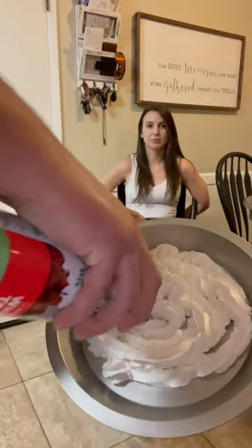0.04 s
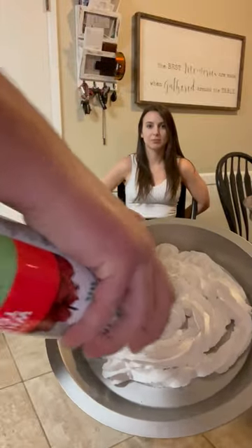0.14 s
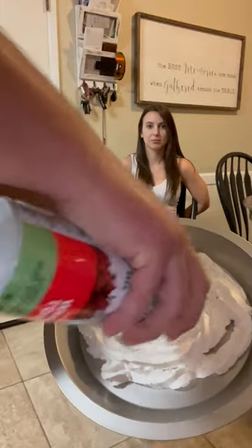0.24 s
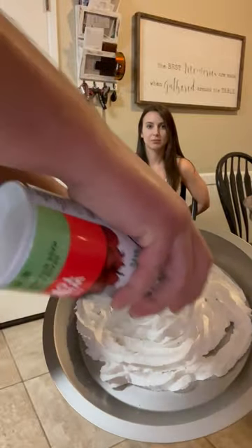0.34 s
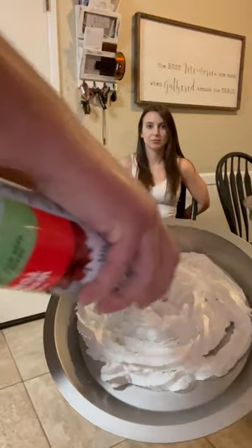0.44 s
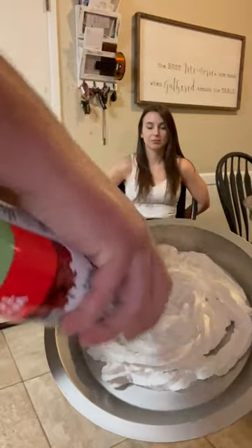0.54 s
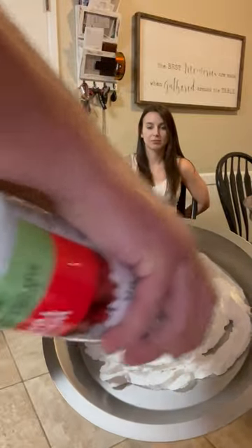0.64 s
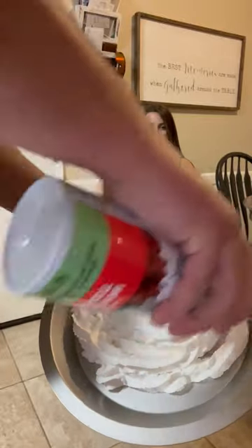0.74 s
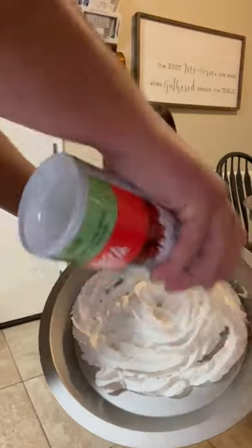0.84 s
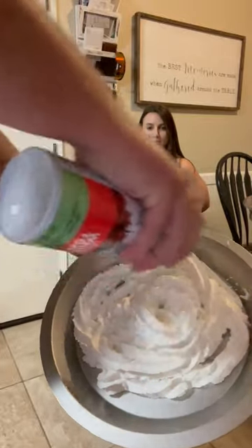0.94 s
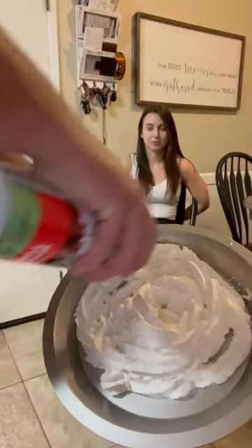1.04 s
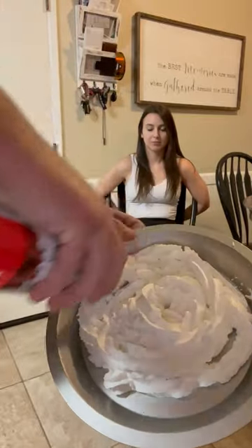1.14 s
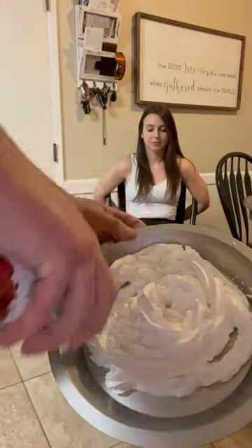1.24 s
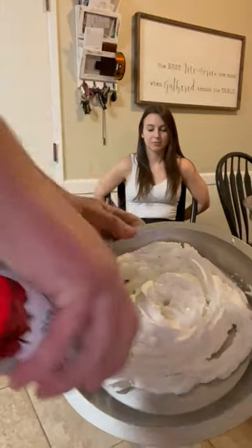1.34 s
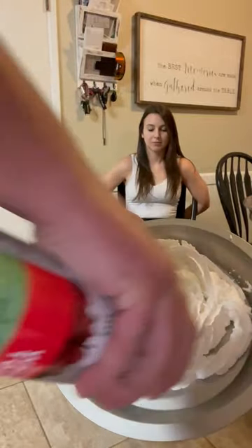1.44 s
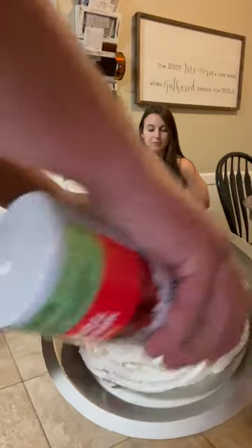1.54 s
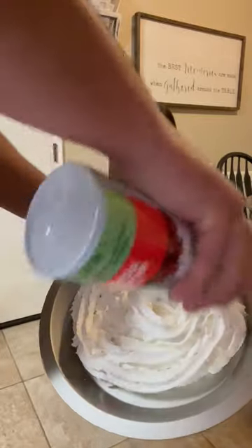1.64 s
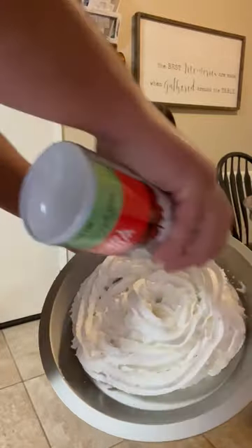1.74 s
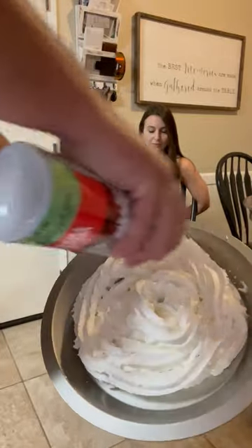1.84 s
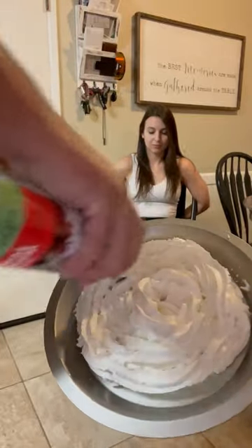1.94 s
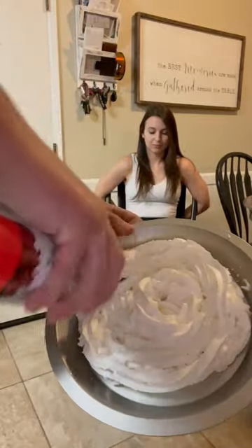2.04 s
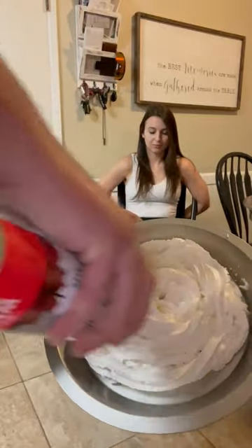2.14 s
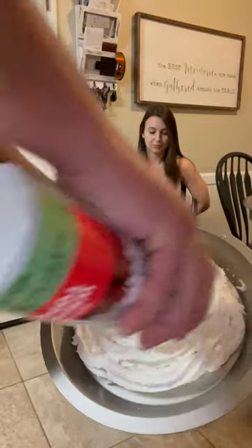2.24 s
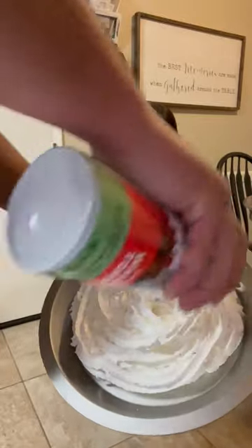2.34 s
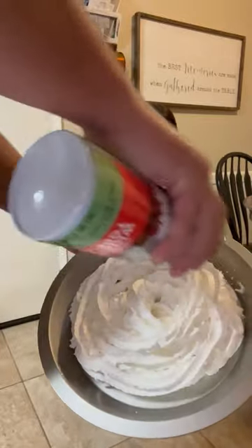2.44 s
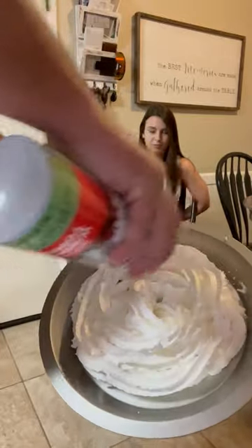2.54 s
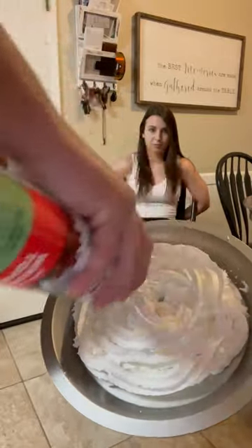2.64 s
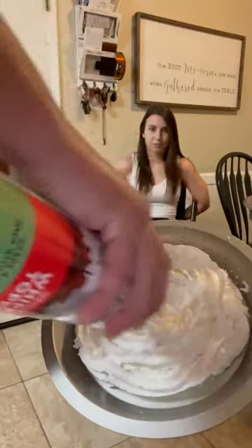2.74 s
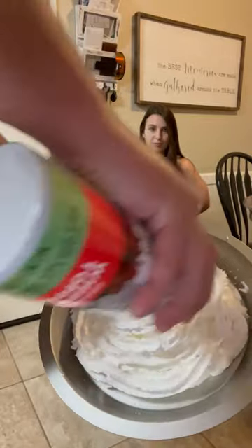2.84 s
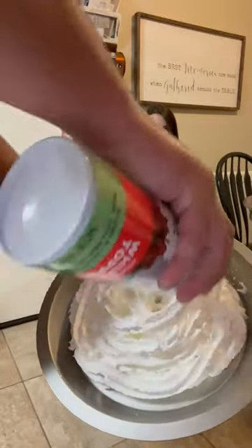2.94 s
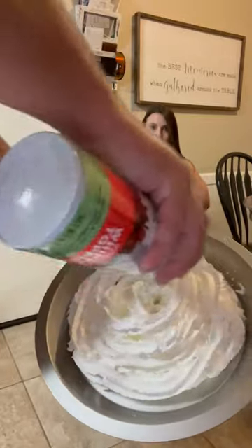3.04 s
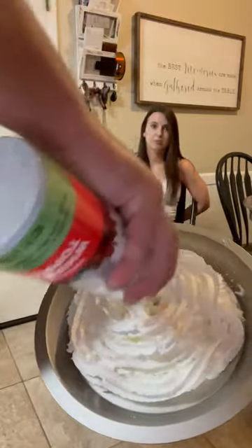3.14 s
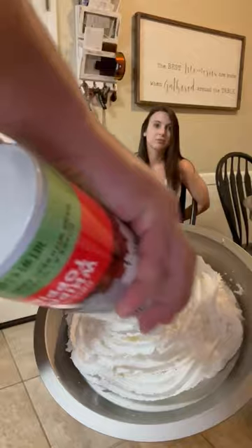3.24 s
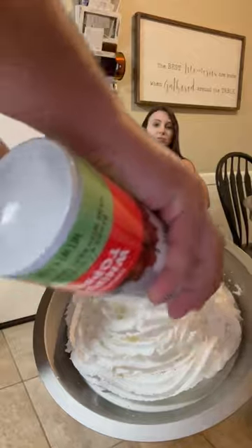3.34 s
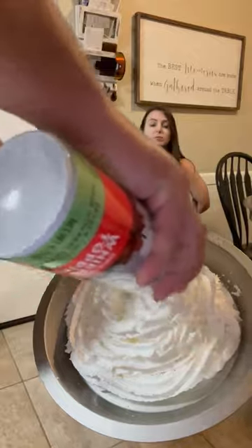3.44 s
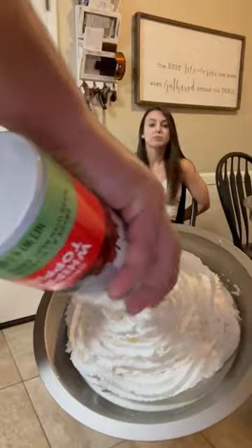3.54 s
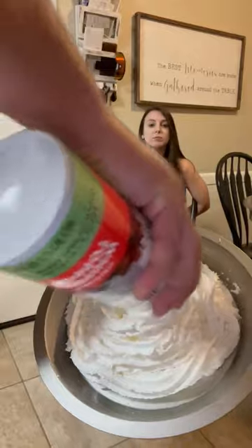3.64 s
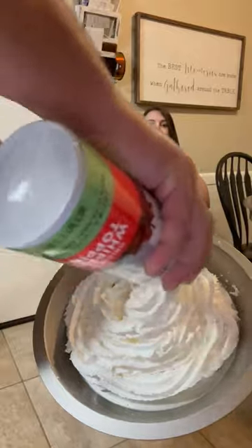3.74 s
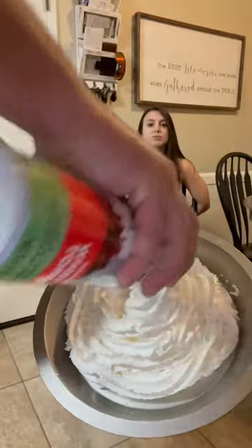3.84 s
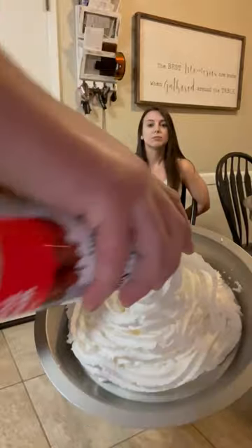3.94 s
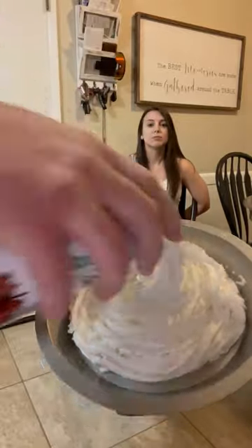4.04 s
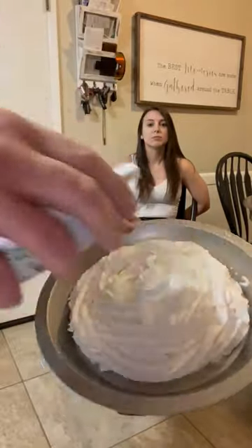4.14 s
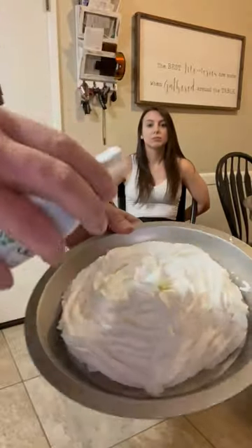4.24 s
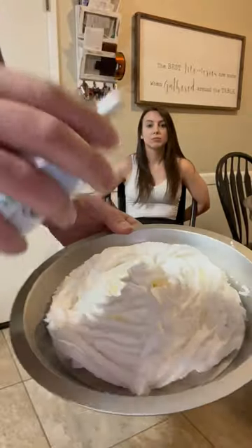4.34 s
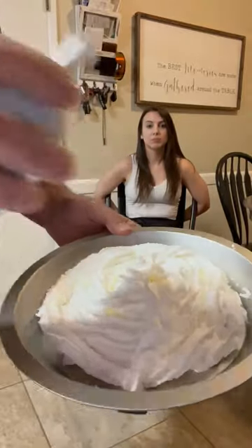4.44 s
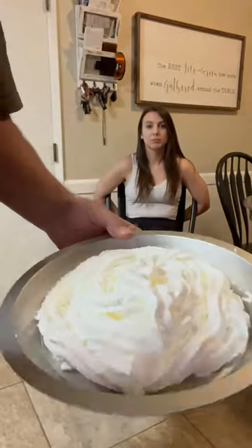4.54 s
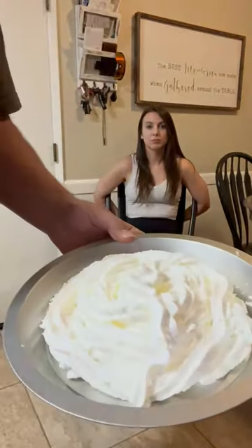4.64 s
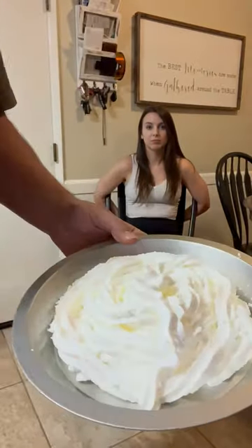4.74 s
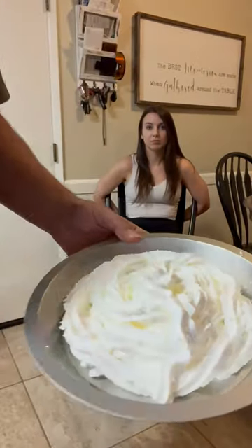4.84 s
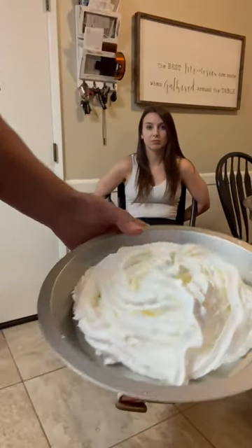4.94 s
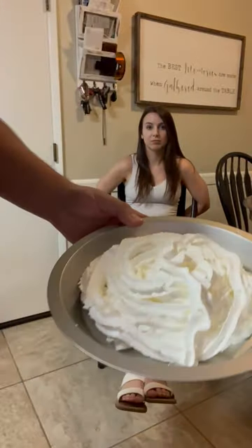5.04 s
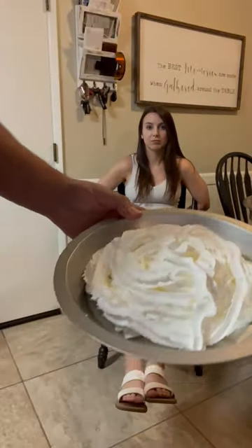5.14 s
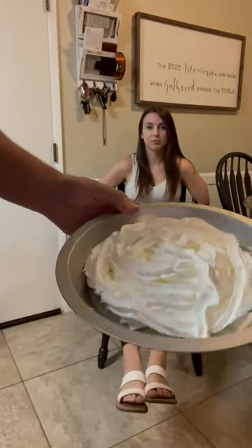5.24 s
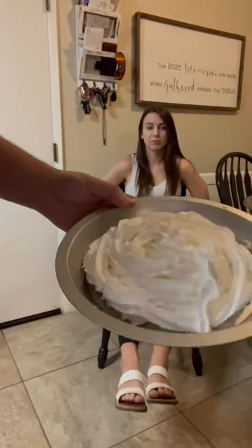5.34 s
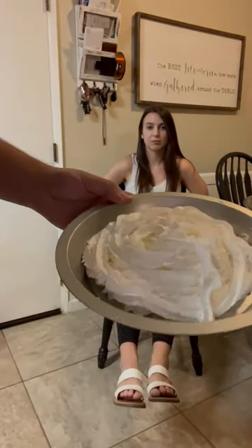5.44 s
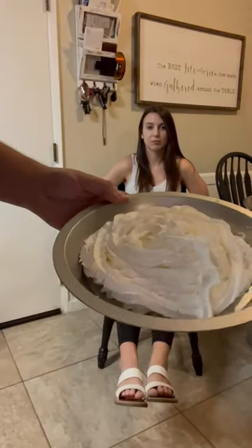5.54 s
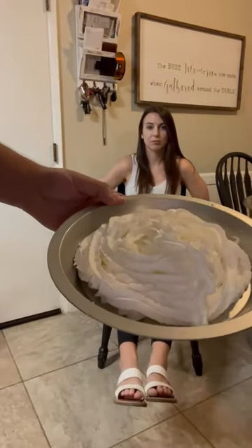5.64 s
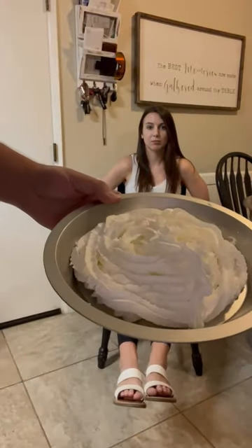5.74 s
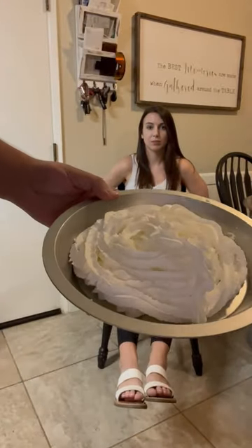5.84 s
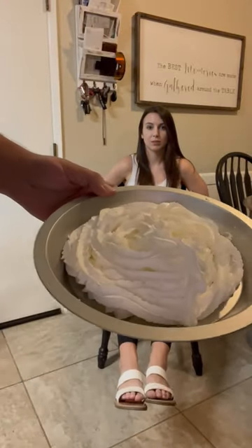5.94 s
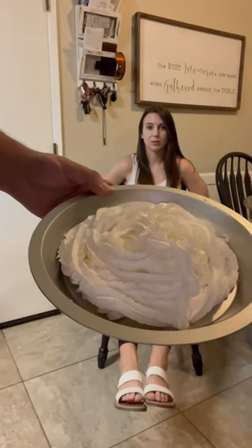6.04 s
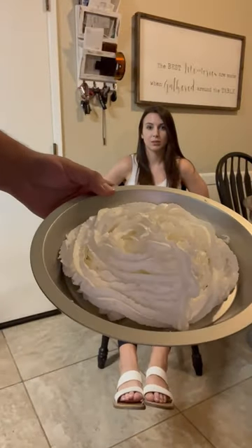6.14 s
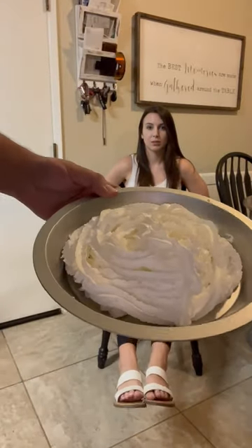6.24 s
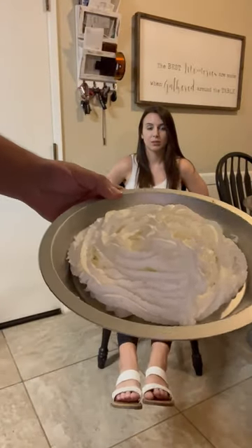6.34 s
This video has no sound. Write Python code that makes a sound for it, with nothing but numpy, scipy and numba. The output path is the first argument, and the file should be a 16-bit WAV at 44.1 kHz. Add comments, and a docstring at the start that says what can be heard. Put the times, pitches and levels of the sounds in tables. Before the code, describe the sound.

Heard very close in stereo, an aerosol can sprays whipped cream into a metal tin with a sputtering, bubbly, whistling hiss that surges as the hand circles. It shuts off suddenly. Faint appliance hum and room air remain, with tiny handling ticks, then the can is set down with a sharp hard knock and small rattling contacts. Soft steps and scuffs follow in the tiled kitchen.

```python
"""An aerosol can sprays whipped cream into a metal pie tin in a tiled kitchen, heard by two close ports.
Gas and foam share the nozzle: bursting cells are filtered noise pulses, jet and whistle are turbulence and
resonance, until the valve snaps shut. The can is then put down with a hard knock and rocks: short contacts
excite its decaying modes and those of the top beneath. Handling ticks and a soft step follow, over
an appliance's hum (steady sines), room air and faint hiss (coloured noise)."""
import sys
import numpy as np
from scipy import signal
from scipy.fft import rfft, irfft, next_fast_len
from scipy.io import wavfile
from scipy.ndimage import uniform_filter1d
from numba import njit

SR = 44100
rng = np.random.default_rng(int(sys.argv[2]) if len(sys.argv) > 2 else 0)


def store_wav(level_fs):
    """Save 16-bit WAV to argv[1]."""
    pcm = np.round(np.clip(np.atleast_2d(level_fs), -1, 1) * 32767)
    wavfile.write(sys.argv[1], SR, pcm.T.astype(np.int16))


N = 282240
T = np.arange(N) / SR


def undb(db):
    """Logarithmic level: decibels to amplitude gain."""
    return 10 ** (np.asarray(db) / 20)


def unit(x):
    """Normalisation: scale to rms 1."""
    return x / np.sqrt(np.mean(x ** 2))


def noise():
    """White noise: equal power at every frequency."""
    return rng.standard_normal(N)


def curves(table):
    """Linear interpolation: each column of a timed table, sample by sample."""
    s, *columns = np.transpose(table)
    return [np.interp(T, s, column) for column in columns]


def on_bins(points, size):
    """Logarithmic frequency scale: join (f/Hz, value) points for each bin of a transform."""
    hz, value = np.transpose(points)
    bins_hz = np.fft.rfftfreq(size, 1 / SR)
    return np.interp(np.log1p(bins_hz), np.log1p(np.abs(hz)), value)


def colour(x, points, size=4096):
    """Minimum-phase filtering: a folded cepstrum gives a causal filter with the (f/Hz, level/dB) outline."""
    cepstrum = irfft(np.log(undb(on_bins(points, size))))
    cepstrum[1:size // 2] *= 2
    cepstrum[size // 2 + 1:] = 0
    response = irfft(np.exp(rfft(cepstrum)))
    return signal.fftconvolve(x, response)[:len(x)]


@njit
def resonate(x, hz, width):
    """Second-order resonance: a band-pass with a moving centre and gain 1 at its peak."""
    y, band, low = np.empty(len(x)), 0., 0.
    for i in range(len(x)):
        g = np.tan(np.pi * min(hz[i] / SR, .45))
        k = width / hz[i]  # damping, the inverse of Q
        v = (band + g * (x[i] - low)) / (1 + g * (g + k))
        band, low = 2 * v - band, low + 2 * g * v
        y[i] = k * v
    return y


def walk(rate):
    """Low-passed random fluctuation: smooth wandering with rms 1, rate in new values per second."""
    k = max(int(SR / rate), 1)
    steps = np.repeat(noise()[:N // k + 1], k)[:N]
    return unit(uniform_filter1d(steps, k))


def fade(start, decay):
    """Exponential relaxation: sudden onset, then a fall with time constant decay."""
    return (T >= start) * np.exp(-np.clip((T - start) / decay, 0, 50))


def blows(rows):
    """Impulsive excitation: one impulse for each (t/s, level/dB) row."""
    x = np.zeros(N)
    for s, db in rows:
        x[int(s * SR)] += undb(db)
    return x


def ring(x, modes):
    """Modal superposition: excite decaying sines (f/Hz, level/dB, T60/s)."""
    t = T[:SR // 2]
    response = 0
    for hz, db, t60 in modes:
        response = response + undb(db) * np.sin(2 * np.pi * hz * t) * np.exp(-np.log(1000) * t / t60)
    return signal.fftconvolve(x, response)[:len(x)]


# How much louder the left port is than the right: f/Hz, level/dB
PORT_BALANCE = [(60, -0.5), (200, 0), (400, 1.5), (700, 2.5), (1290, 5), (2100, 1), (3000, 2.5), (4400, 0),
                (8000, -0.5), (9500, 0), (15000, 0)]


def ports(x, lead):
    """Interchannel difference: two ports hear one source with a phase (f/Hz, left lead/rad) and level gap."""
    size = next_fast_len(N + SR // 4)
    phase = np.interp(np.fft.rfftfreq(size, 1 / SR), *np.transpose(lead))
    half = undb(on_bins(PORT_BALANCE, size) / 2) * np.exp(.5j * phase)  # half the gap on each side
    return irfft(rfft(x, size) * np.array([half, 1 / half]), size)[:, :N]


def diffuse(size, apart_hz=750):
    """Diffuse-field coherence: stereo noise alike in the bass, unrelated in the treble."""
    mid, side = rfft(rng.standard_normal((2, size)))
    hz = np.fft.rfftfreq(size, 1 / SR)
    share = .5 * hz ** 1.5 / (hz ** 1.5 + apart_hz ** 1.5)
    return irfft(np.sqrt(1 - share) * mid + np.sqrt(share) * side * np.array([[1], [-1]]), size)


# Reverberation time of the room: f/Hz, T60/s
ROOM_DECAY = [(100, .58), (500, 0.47), (1300, 0.45), (3000, 0.62), (6000, 0.45), (10000, 0.3), (16000, 0.3)]
# Spectral balance of the reverberation: f/Hz, level/dB
REVERB_TONE = [(100, -2), (500, 2.5), (1200, 1), (2500, -4), (4200, -1.5), (6500, -2.5), (7700, -5),
               (9000, -6), (10500, 0), (12000, 4.5), (16000, -6)]


def kitchen(x, build_s=0.012):
    """Reverberation: dense echoes from tiles and walls build up, then die, quickest at the top of the treble."""
    size = 256
    _, t, frames = signal.stft(diffuse(SR), SR, nperseg=size)
    decay = np.exp(-np.log(1000) * t / on_bins(ROOM_DECAY, size)[:, None])
    tone = undb(on_bins(REVERB_TONE, size))[:, None]
    build = 1 - np.exp(-t / build_s)
    response = signal.istft(frames * decay * tone * build, SR)[1]
    return signal.fftconvolve(x[None], response / np.sqrt(SR / 20), axes=1)[:, :N]


# Partials of the appliance: f/Hz, level/dB
HUM_PARTIALS = [(59.2, -71.5), (118.4, -66), (177.6, -59.5), (355.3, -62.5), (473.7, -78.5)]


def hum():
    """Additive synthesis: an appliance's partials waver slightly in level."""
    sound = 0
    for hz, db in HUM_PARTIALS:
        sound = sound + undb(db + 1.0 * walk(4.6)) * np.sin(2 * np.pi * (hz * T + rng.random()))
    return sound


# Spectrum of the still air: f/Hz, density/dB
AIR_SPECTRUM = [(30, -14.5), (62, 1), (110, -4.5), (200, -5), (340, -8), (550, -12.5), (800, -17),
                (1300, -25.5), (1650, -20.5), (2300, -37), (6000, -39.5), (9000, -55), (13000, -50.5),
                (16000, -53.5)]


def air():
    """Diffuse sound field: coloured noise from all directions is the room at rest."""
    sound = unit(np.array([colour(x, AIR_SPECTRUM) for x in diffuse(N)]))
    return sound * undb(-56 + 0.23 * walk(8.4))


# Spectrum of the faint hiss: f/Hz, density/dB
HISS_SPECTRUM = [(900, 0.5), (2100, 0), (2750, 6), (3400, -7.5), (4150, 0.5), (5000, -8.5), (9000, -23),
                 (13000, -22.5), (16000, -25)]
# Its coming and going: t/s, level/dB
HISS_LEVELS = [(4.0, -66), (4.3, -65), (4.5, -74), (4.9, -86), (5.05, -55), (5.6, -70.5), (5.85, -80),
               (5.95, -61.5), (6.4, -61.5)]
# Spectrum of a faint high fizz: f/Hz, density/dB
FIZZ_SPECTRUM = [(5000, -20.5), (10000, -7.5), (12500, -1), (16000, -6.5)]
# Its course, to which a random flutter is added: t/s, level/dB
FIZZ_LEVELS = [(4.0, -84), (4.33, -86), (4.62, -73), (4.85, -83), (5.0, -82), (5.3, -74), (5.5, -80),
               (5.75, -78), (6.1, -78), (6.3, -78), (6.39, -70)]


def hiss():
    """Precedence effect: hiss and fizz arrive first and louder at the left, so they seem to lie there."""
    sound = unit(colour(noise(), HISS_SPECTRUM)) * undb(curves(HISS_LEVELS)[0])
    fizz = unit(colour(noise(), FIZZ_SPECTRUM))
    sound = sound + fizz * undb(curves(FIZZ_LEVELS)[0] + 1.2 * walk(14))
    late = np.interp(T - .00027, T, sound)
    return np.array([sound, undb(-1.5) * late])


def background():
    """Superposition: hum, still air and faint hiss add."""
    return hum() + air() + hiss()


# Contacts of soft steps on the floor: t/s, relative level/dB
STEP_CONTACTS = [(5.700, -43.5), (5.754, -33), (5.772, -36.5), (5.797, -38), (5.818, -41.5), (6.032, -39.5),
                 (6.046, -42)]
# Modes of the floor: f/Hz, level/dB, T60/s
FLOOR_MODES = [(67.7, -6, .09), (108, 4.5, 0.06), (149, -0.5, 0.075), (255, -1, 0.06), (345, -3, 0.06),
               (780, -13, .035)]


def steps():
    """Impact excitation: each soft contact sets the floor's damped modes ringing."""
    return undb(-2.5) * ring(blows(STEP_CONTACTS), FLOOR_MODES)


# Ticks and scuffs: t/s, relative level/dB, centre f/Hz, width/Hz, rise and decay time constants/s
TICK_EVENTS = [(4.077, -66, 13100, 9050, .002, 0.0044), (4.202, -69, 13000, 8970, 0.0019, .004),
               (4.354, -51, 8990, 11000, 0.0042, 0.017), (4.744, -58, 2490, 2500, 0.0024, 0.0055),
               (5.660, -49, 2700, 1790, 0.001, .005), (5.670, -54, 3200, 5000, 0.0011, 0.0045),
               (5.68, -58, 2500, 4000, .03, .05), (5.705, -52.5, 2200, 2400, .003, 0.012),
               (5.743, -45.5, 1500, 2400, 0.001, 0.009), (5.756, -42.5, 700, 1000, 0.004, 0.022),
               (5.834, -57, 12500, 4980, 0.002, 0.004), (5.89, -55.5, 5930, 1110, 0.04, 0.043),
               (6.115, -53, 12940, 4480, 0.0019, 0.003), (6.18, -57.5, 12000, 12100, 0.016, .02)]


def ticks():
    """Friction noise: fingers and clothes make short bands of noise."""
    sound = 0
    for s, db, hz, width, rise, decay in TICK_EVENTS:
        centre = np.full(N, float(hz))
        once = resonate(noise(), centre, float(width))
        scuff = unit(resonate(once, centre, float(width)))
        sound = sound + undb(db) * fade(s, decay) * (1 - fade(s, rise)) * scuff
    return sound


# Phase lead of the left port for the knock and handling: f/Hz, lead/rad
KNOCK_PHASE = [(0, 0.3), (500, 2.75), (850, 1.7), (1200, 2.5), (1600, 1.75), (2000, 2.1), (2500, 0.59),
               (3200, 1.8), (4100, 1.2), (4800, 2.5), (6400, 1.4), (9000, 3.1), (13300, 5.1)]


def handling():
    """Direct and reverberant sound: steps and ticks at the two ports, with the room."""
    sound = steps() + ticks()
    return ports(sound, KNOCK_PHASE) + undb(-6.0) * kitchen(sound)


# Modes of the can: f/Hz, level/dB, T60/s
CAN_MODES = [(360, -16, .03), (720, -25, .04), (930, -20, 0.03), (985, -23, 0.11), (1270, -12.5, 0.06),
             (1430, -19, 0.09), (1530, -6, 0.012), (1720, -17, .03), (1905, -8.5, 0.018), (1980, -23, .05),
             (2480, -10, 0.008), (2750, -13, .012), (4200, -15, 0.014), (6150, -17, 0.01)]
# How well the can radiates: f/Hz, level/dB
CAN_RADIATION = [(60, -16), (200, -8), (500, 1), (900, 6), (1450, 2), (2000, 6), (2600, 1), (3300, -6),
                 (4200, -2.5), (5000, -5.5), (6500, -5), (9000, -28)]
# Spectrum of the rim's crack: f/Hz, density/dB
CRACK_SPECTRUM = [(100, -19.5), (500, -11.5), (1500, 6), (2500, 3), (3200, -8), (4200, -9), (4900, -16),
                  (6100, -1.5), (7000, -10), (8000, -22), (11000, -15), (16000, -23)]
FOCUS_DB, FOCUS_OCTAVES = 8, .22  # how strongly and how narrowly a spot favours its modes
BUZZ_DB, DETUNE = -22, .018  # the rim's buzz against the blow; scatter of the modes' pitch (share)


def contact(db, hard_db, buzz_s, focus_hz):
    """Position-dependent modal excitation: one touch cracks and buzzes; each spot favours and detunes modes."""
    t = T[:SR // 2]
    buzz, grit = rng.standard_normal((2, len(t)))
    push = (t == 0) + undb(BUZZ_DB) * buzz * np.exp(-t / buzz_s)
    hz, mode_db, t60 = np.transpose(CAN_MODES)
    favoured = np.exp(-(np.log2(hz / focus_hz) / FOCUS_OCTAVES) ** 2)
    detuned_hz = hz * np.exp(DETUNE * rng.standard_normal(len(hz)))
    modes = zip(detuned_hz, mode_db + FOCUS_DB * favoured, t60)
    body = colour(ring(push, modes), CAN_RADIATION)
    crack = colour(grit * np.exp(-t / 0.0016), CRACK_SPECTRUM)
    return undb(db) * (undb(-8.5) * body + undb(-5.5) * undb(hard_db) * crack)


# The rim meeting a hard top: t/s, relative level/dB, hardness (relative crack level)/dB,
# time constant of the buzz/s, favoured f/Hz
RIM_CONTACTS = [(5.0166, -25, -26, .005, 1560), (5.0210, -11, -26, 0.0026, 1560),
                (5.0268, -9, -14, .003, 2600), (5.0284, -1, -1, .0032, 1600),
                (5.0334, -12, -22, 0.0034, 1280), (5.048, -22, -16, .005, 1300),
                (5.072, -23, -20, .005, 1400), (5.133, -27, -20, .006, 1440),
                (5.1617, -13, -14, 0.0037, 1250), (5.1902, -17, 0, .005, 900),
                (5.1925, -17, -6, .004, 1300), (5.2112, -23.5, -1, .005, 1000),
                (5.219, -26, -5, .003, 1700)]
# The can's weight coming down on the top: t/s, relative level/dB
WEIGHT_THUMPS = [(5.036, 0), (5.194, -9)]
# Modes of the top: f/Hz, level/dB, T60/s
TOP_MODES = [(135, -2, .26), (242, -4, .16), (345, -3, .05), (510, 0, .07), (673, -2, .16), (748, -3, .2)]
# Single echoes from nearby walls: delay t/s, level/dB
NEARBY_WALLS = [(0.023, -15), (.061, -23.5)]


def can():
    """Multiple impact: the rim lands in quick contacts and rocks back; the top thumps a moment later."""
    sound = undb(-30) * ring(blows(WEIGHT_THUMPS), TOP_MODES)
    for s, *touch_settings in RIM_CONTACTS:
        touch, start = contact(*touch_settings), int(s * SR)
        sound[start:start + len(touch)] += touch
    echoes = sum(undb(db) * np.interp(T - delay, T, sound) for delay, db in NEARBY_WALLS)
    echoes = colour(echoes, [(2000, -0.5), (6000, -5), (10000, -12)])
    nearby = kitchen(sound, build_s=0.013)[0]  # most echoes come from the side where the can stands
    direct = ports(sound + echoes + undb(-8.0) * nearby, KNOCK_PHASE)
    return direct + undb(-7.5) * kitchen(sound, build_s=0.0078)


# Swells as the hand circles, with gas surging on some turns: middle t/s, length t/s, foam swell/dB,
# gas surge/dB (each layer follows in its own proportion), foam pocket f/Hz, gas channel f/Hz
HAND_TURNS = [(0.297, 0.11, 6, 8.5, 1030, 3400), (0.739, .16, 5.5, 9.5, 1030, 4000),
              (0.988, 0.21, 4, -0.5, 1200, 3700), (1.447, 0.13, 1.5, 2, 1370, 3570),
              (1.9, 0.21, 3, -0.5, 1130, 3740), (2.275, .18, 6.5, 10.5, 1040, 3800),
              (2.564, 0.13, 2, -1, 1130, 3750), (2.856, 0.083, 6, 11.5, 1070, 4140),
              (2.953, 0.072, 5, 7.5, 1070, 3130), (3.375, 0.13, 7, 6, 1300, 2900),
              (3.728, 0.089, 5.5, 5, 870, 4120)]
TURN_EDGE = 5.1  # steepness of a swell's flanks: higher is more flat-topped
POCKET_REST_HZ, CHANNEL_REST_HZ = 941, 3600  # resonances between swells


def turns():
    """Slow modulation: rounded humps of foam swell (dB), gas surge (dB), pocket and channel pitch (Hz)."""
    swell, surge, pocket_hz, channel_hz = 0, 0, POCKET_REST_HZ, CHANNEL_REST_HZ
    for s, length, foam_db, gas_db, foam_hz, gas_hz in HAND_TURNS:
        hump = np.exp(-np.abs(2 * (T - s) / length) ** TURN_EDGE * np.log(2))
        swell, surge = swell + foam_db * hump, surge + gas_db * hump
        pocket_hz = pocket_hz + (foam_hz - POCKET_REST_HZ) * hump
        channel_hz = channel_hz + (gas_hz - CHANNEL_REST_HZ) * hump
    return swell, surge, pocket_hz, channel_hz


def bubbles(per_s, spread_db):
    """Poisson-like shot noise: tiny gas cells burst at random moments, with random sizes."""
    bursts = rng.random(N) < per_s / SR
    return unit(bursts * noise() * undb(spread_db * noise()))


# Spectrum of the sputtering foam: f/Hz, density/dB
FOAM_SPECTRUM = [(60, -38), (200, -25.5), (400, -17), (520, -7), (650, -1), (830, -1.5), (1050, -5.5),
                 (1380, 0), (1650, -3.5), (2000, -15.5), (3000, -21.5), (8000, -40.5)]
POCKET_WIDTH_HZ, POCKET_DB = 330., 3  # the pocket's resonance
POCKET_PER_SWELL = 0.38  # its ring grows by this many dB for each dB of swell


def foam(swell, pocket_hz, sputter, unsteady):
    """Cavity resonance: cells burst in a pocket of cream whose pitch wanders."""
    bursts = unit(colour(bubbles(per_s=5000, spread_db=2.0), FOAM_SPECTRUM))
    pocket = resonate(bursts, pocket_hz * np.exp(0.077 * walk(15)), POCKET_WIDTH_HZ)
    sound = unit(bursts + undb(POCKET_DB + POCKET_PER_SWELL * swell) * pocket)
    return sound * undb(-31.5 + 0.74 * swell + 0.44 * sputter + 0.66 * unsteady)


# Spectrum of cream landing on the mound: f/Hz, density/dB
LANDING_SPECTRUM = [(40, -17), (70, -13), (150, -13.5), (260, 1), (420, 0), (560, 1), (800, -7),
                    (1600, -27)]


def flutter(surge, sputter):
    """Random impacts: landing cream makes a low flutter that grows with the gas."""
    sound = unit(colour(bubbles(per_s=2500, spread_db=2.0), LANDING_SPECTRUM))
    return sound * undb(-46 + 0.42 * surge + 0.47 * sputter)


# Spectrum of escaping gas: f/Hz, density/dB
RASP_SPECTRUM = [(800, -23.5), (1900, -2), (2500, 0), (2950, -3), (3600, -0.5), (4300, 0), (5200, -2.5),
                 (7500, -10), (15000, -26)]
# Level of the rasp between surges: t/s, level/dB
RASP_LEVELS = [(0, -32.5), (.42, -41), (.58, -35.5), (.9, -40), (1.25, -34.5), (1.72, -42.5), (2.1, -38),
               (2.65, -36.5), (3.5, -35)]
CHANNEL_WIDTH_HZ, CHANNEL_DB = 445., 4  # resonance of the channel that the gas opens through the cream


def rasp(surge, channel_hz, sputter, unsteady):
    """Duct resonance: gas bursts through a channel in the cream that keeps changing."""
    gas = unit(colour(bubbles(per_s=7000, spread_db=2.5), RASP_SPECTRUM))
    channel = resonate(gas, channel_hz * np.exp(0.07 * walk(11)), CHANNEL_WIDTH_HZ)
    gas = unit(gas + undb(CHANNEL_DB) * channel)
    return gas * undb(curves(RASP_LEVELS)[0] + surge + .77 * sputter + .9 * unsteady)


# Whistle pitch as the finger's pressure changes: t/s, f/Hz
WHISTLE_PITCHES = [(0.0, 6200), (0.88, 6060), (1.39, 6310), (1.52, 6040), (1.66, 6300), (1.79, 6030),
                   (2.06, 6170), (2.27, 5900), (2.37, 6340), (2.84, 6040), (3.31, 6320), (3.8, 6070)]
# Whistle level between surges: t/s, level/dB
WHISTLE_LEVELS = [(0, -37.5), (.25, -34.5), (.45, -38.5), (.75, -37.5), (.87, -33.5), (1.05, -35.5),
                  (1.42, -38), (1.55, -29), (1.75, -33.5), (2.12, -38), (2.3, -31), (2.9, -34), (3.3, -33),
                  (3.45, -32.5), (3.6, -33)]


def whistle(surge):
    """Noise-driven resonance: the nozzle's slit rings, and its pitch wavers as cream passes."""
    slit_hz = curves(WHISTLE_PITCHES)[0] * (1 + 0.015 * walk(14))
    slit = resonate(noise(), slit_hz, 900.)
    return unit(resonate(slit, slit_hz, 2500.)) * undb(curves(WHISTLE_LEVELS)[0] - .35 * surge)


# Level of a thin lower whistle, strongest in the first second: t/s, level/dB
PIPING_LEVELS = [(0, -47), (.2, -44), (.4, -50), (.55, -48), (.75, -42), (.9, -70)]


def piping():
    """Narrow-band resonance: filtered noise makes a thin whistle of wavering pitch."""
    piping_hz = 2240 * (1 + .008 * walk(12))
    narrow = resonate(noise(), piping_hz, 130.)
    return unit(resonate(narrow, piping_hz, 400.)) * undb(curves(PIPING_LEVELS)[0])


# Spectrum of the fine jet: f/Hz, density/dB
JET_SPECTRUM = [(500, -21.5), (2000, -1), (4500, -6), (6900, -2.5), (7700, 2.5), (8500, -1), (9500, -4),
                (10100, 0.5), (11100, 0.5), (11900, -7), (14000, -23.5)]
# Level of the jet between surges: t/s, level/dB
JET_LEVELS = [(0, -33.5), (.15, -33.5), (.3, -35), (.55, -31.5), (.9, -31.5), (1.22, -35), (1.55, -31.5),
              (1.87, -30.5), (2.05, -33), (2.4, -31), (2.68, -32), (2.85, -31.5), (3, -31), (3.2, -31.5),
              (3.8, -29.5)]


def jet(surge, sputter, unsteady):
    """Turbulence: the fine jet is broadband noise that follows the flow."""
    level = curves(JET_LEVELS)[0] + 0.35 * surge + 0.62 * sputter + 0.43 * unsteady
    return unit(colour(noise(), JET_SPECTRUM)) * undb(level)


# Spectrum of the finest hiss: f/Hz, density/dB
MIST_SPECTRUM = [(9500, -30), (11200, -7), (12300, 0.5), (13200, -4.5), (14000, -4), (15700, -10)]
# Its level between surges: t/s, level/dB
MIST_LEVELS = [(0, -39), (.62, -39.5), (.76, -38.5), (.85, -38), (1.6, -37.5), (1.85, -39.5), (2.05, -39),
               (2.3, -39.5), (2.6, -41), (2.85, -42.5), (2.93, -39), (3.05, -44), (3.38, -41), (3.5, -44),
               (3.8, -40.5)]


def mist(surge, sputter, unsteady):
    """Fine-scale turbulence: noise at the top of the treble has a wandering peak."""
    hiss_band = colour(noise(), MIST_SPECTRUM)
    peak = resonate(hiss_band, 12500 * np.exp(.06 * walk(8)), 900.)
    level = curves(MIST_LEVELS)[0] + 0.42 * surge + 0.6 * sputter + .3 * unsteady
    return unit(hiss_band + undb(-6.5) * peak) * undb(level)


# Larger gas pockets that burst: t/s, relative level/dB
SPIT_BURSTS = [(.277, -12), (.704, -7), (.759, -12.5), (.772, -11.5), (.792, -14), (.907, -15.5),
               (1.716, -15.5), (1.767, -6.5), (2.199, -9), (2.828, -13.5), (2.852, -8.5)]
# Modes of a bursting pocket: f/Hz, level/dB, T60/s
SPIT_MODES = [(750, -11, 0.0022), (1204, 2, 0.0035), (3906, -10.5, 0.0039)]


def spits():
    """Impulse response of a cavity: each bursting pocket rings for a few cycles."""
    # the bursts carry no bass
    return colour(ring(blows(SPIT_BURSTS), SPIT_MODES), [(100, -31), (700, -1.5)])


# Modes of the tin, damped by the cream: f/Hz, level/dB, T60/s
TIN_MODES = [(595, 1, 0.051), (712, -3, 0.068), (787, 0, 0.088), (911, 4, 0.054), (1400, -3.5, 0.056),
             (2547, -1, 0.1), (3635, 1.5, 0.07), (3896, 1, 0.066), (4281, 4, .1)]
VALVE_SHUT_S, VALVE_CLOSE_S = 3.821, 0.0024  # start and time constant of the closing


def spray():
    """Two-phase flow: foam and gas share one unsteady nozzle until the valve shuts; the tin rings faintly."""
    swell, surge, pocket_hz, channel_hz = turns()
    sputter = walk(230)  # plugs of cream chop the flow
    unsteady = walk(22.01)  # the flow also wavers more slowly
    cream = foam(swell, pocket_hz, sputter, unsteady) + flutter(surge, sputter)
    gas = rasp(surge, channel_hz, sputter, unsteady) + jet(surge, sputter, unsteady)
    gas = gas + mist(surge, sputter, unsteady) + whistle(surge) + piping()
    valve = np.exp(-np.clip((T - VALVE_SHUT_S) / VALVE_CLOSE_S, 0, 20))
    sound = (cream + gas + spits()) * valve
    return sound + undb(-55) * ring(sound, TIN_MODES)


def glance(x, count=7):
    """Early reflections: paths off tin and arm, 1 to 6 ms late, come and go as the hand circles."""
    lags = rng.uniform(.001, .006, count)
    return sum(np.roll(x, int(lag * SR)) * walk(6) for lag in lags) / np.sqrt(count)


# Centre of the band heard in opposite phase, shifting as the hand circles: t/s, f/Hz
HOLLOW_PITCH = [(0, 1980), (.3, 2110), (.5, 1960), (.75, 2170), (1.17, 2160), (1.4, 2000), (1.6, 2140),
                (1.85, 2000), (2.06, 2230), (2.15, 1990), (2.42, 2160), (2.8, 2070), (3.35, 2130),
                (3.7, 2000)]
# What the tin and the arm throw back: f/Hz, level/dB
REFLECTED_TONE = [(150, -10), (550, -1), (1200, -2), (1700, 1), (2100, 0), (2700, 3.5), (3700, 0),
                  (4800, 2.0), (6500, -1.5), (7800, -6.5), (9000, -32), (10500, -7), (12000, -4)]
# What escapes into the room: f/Hz, level/dB
ROOM_SEND = [(550, -1), (800, -4), (1400, 0), (2200, 4), (3500, 0), (9000, 2), (13000, -2)]
# Phase lead of the left port for the spray: f/Hz, lead/rad
SPRAY_PHASE = [(0, 0), (340, -0.2), (1120, 0.3), (1600, -0.52), (2150, 0), (2650, -0.2), (3250, 0.41),
               (4100, 0.06), (4900, 1.7), (6200, 0.88), (7500, 2.06), (8100, 2.5), (8450, 3), (9600, 3),
               (10300, 4), (11200, 4), (12500, 6), (13300, 5.5), (16000, 6.5)]


def heard_spray(sound):
    """Superposition of paths: direct spray at two ports, near reflections and reverberation."""
    hollow_hz = curves(HOLLOW_PITCH)[0]
    surge = turns()[1]
    thrown = colour(sound, REFLECTED_TONE) * undb(-.22 * surge)  # surges are heard more directly
    thrown = thrown - .55 * resonate(thrown, hollow_hz, 400.)
    near = np.array([glance(thrown), glance(thrown)])
    room = kitchen(colour(sound, ROOM_SEND))[0]
    left, right = ports(sound + undb(-14) * room, SPRAY_PHASE)
    # flips the phase of the hollow band
    left = left - 2 * resonate(np.ascontiguousarray(left), hollow_hz, 800.)
    return np.array([left, right]) + undb(-6) * near + undb(-9.5) * kitchen(thrown)


def scene():
    """Linear superposition: everything in the kitchen adds."""
    return background() + handling() + can() + heard_spray(spray())


def record(dry):
    """Band limiting: thin the bass below 53 Hz, clip at 0.9 of full scale and cut above 15.8 kHz."""
    low_cut = signal.butter(5, 53, "high", fs=SR, output="sos")
    top_cut = signal.ellip(10, .2, 70, 15800, fs=SR, output="sos")
    x = np.clip(signal.sosfilt(low_cut, dry), -.9, .9)
    return signal.sosfilt(top_cut, x)


dry = scene()
out = record(dry)
store_wav(out)
```